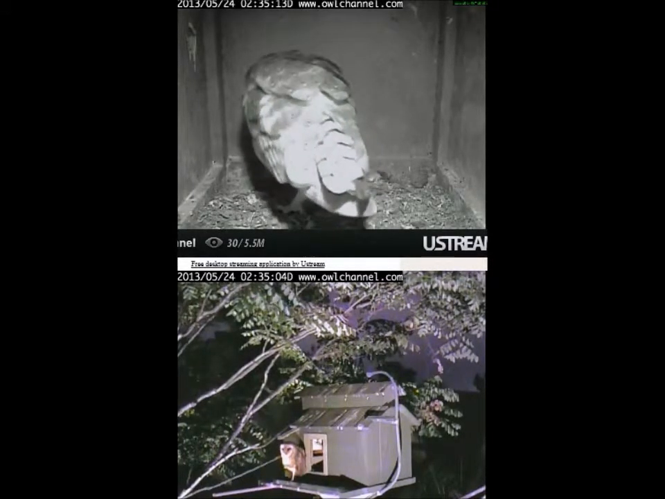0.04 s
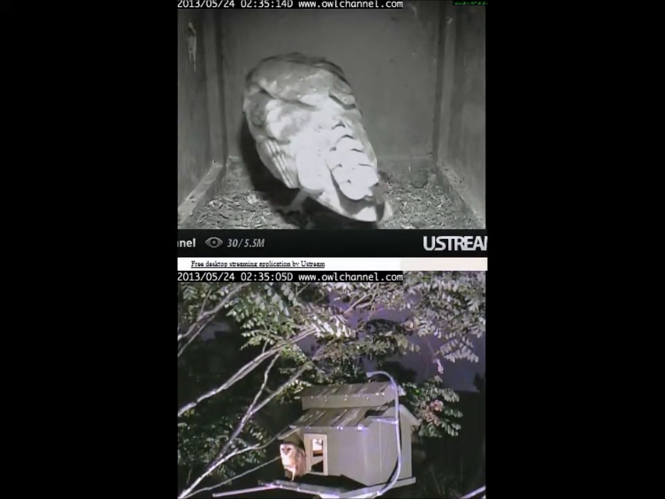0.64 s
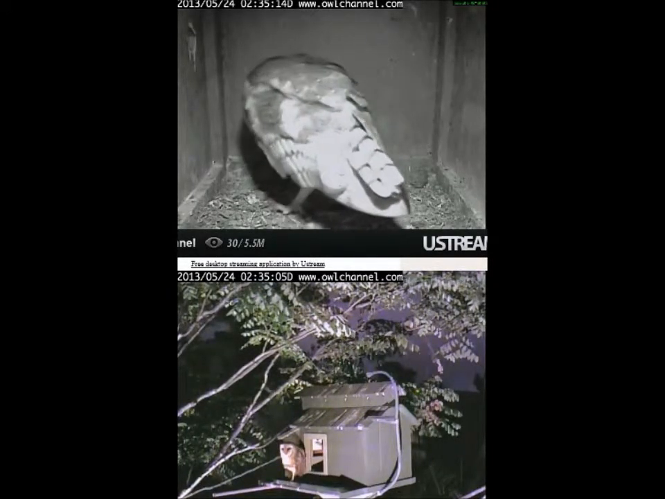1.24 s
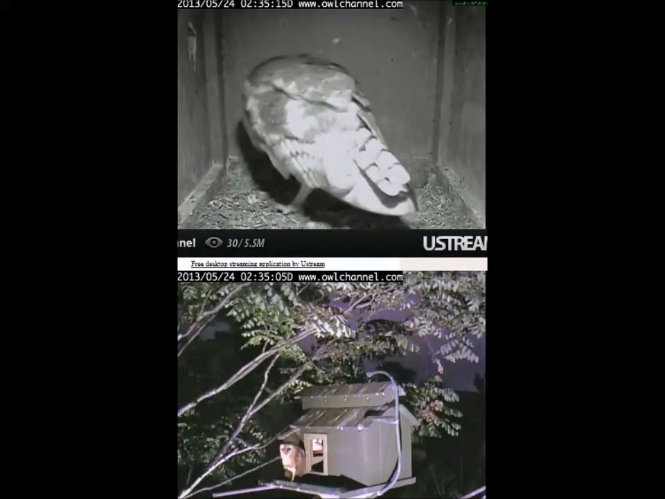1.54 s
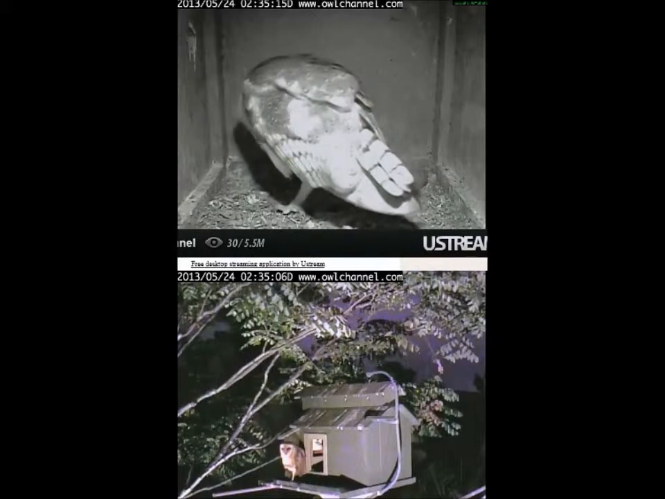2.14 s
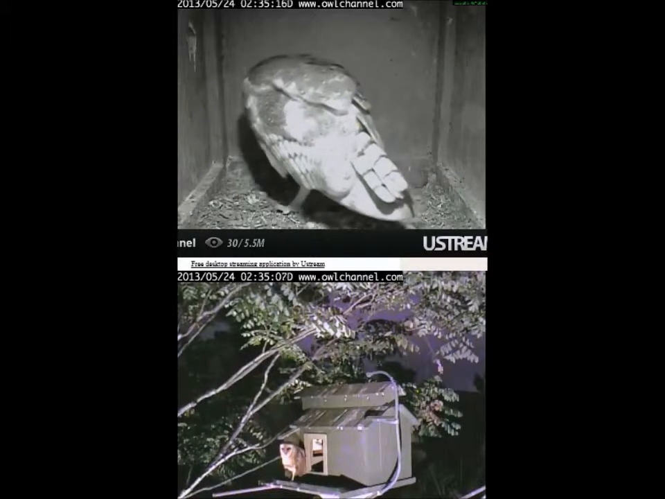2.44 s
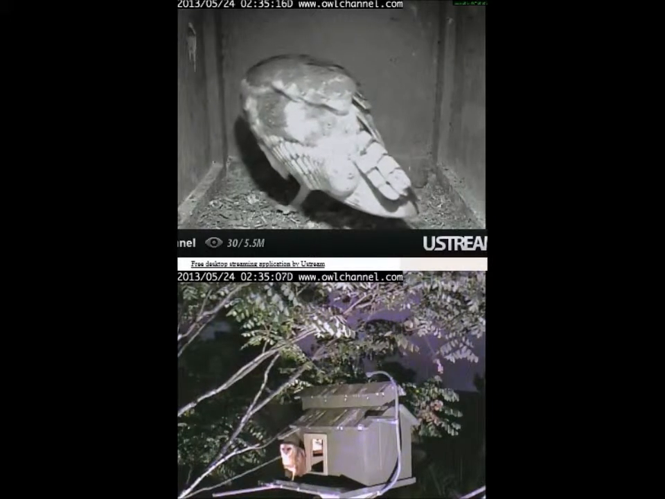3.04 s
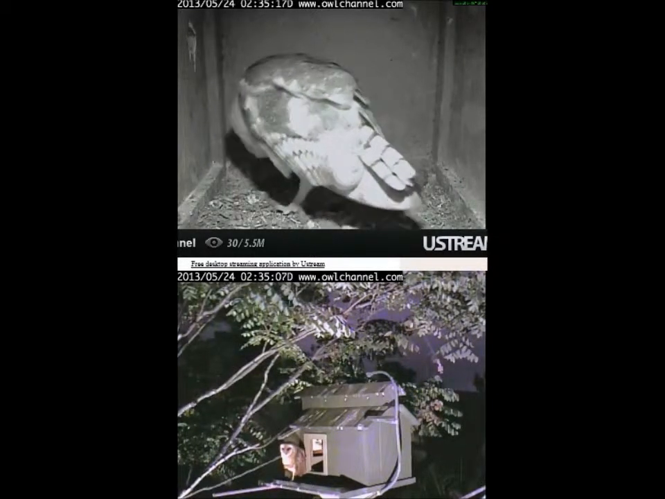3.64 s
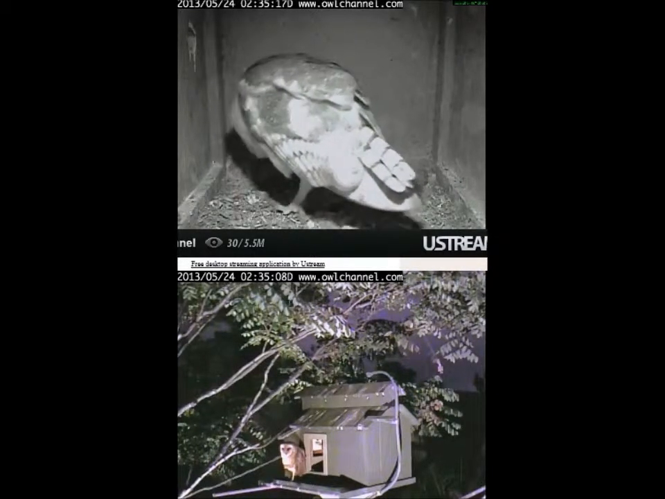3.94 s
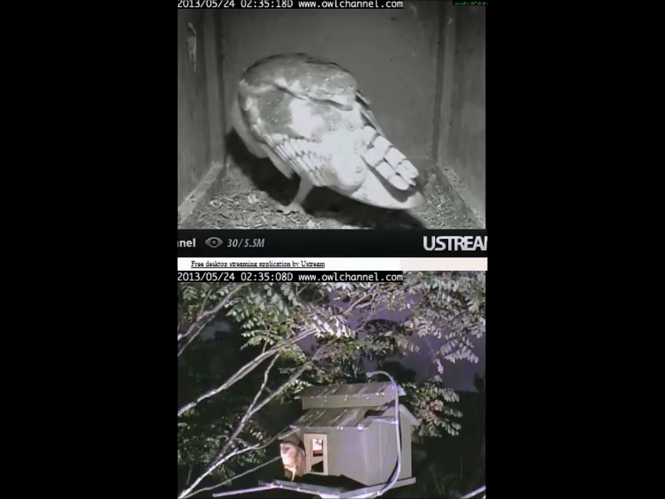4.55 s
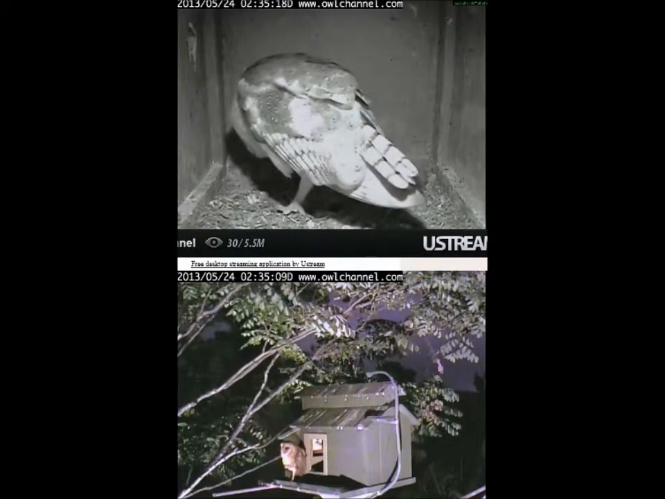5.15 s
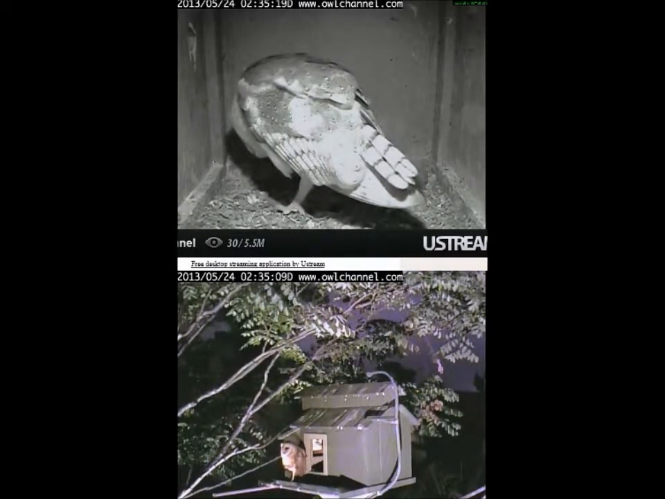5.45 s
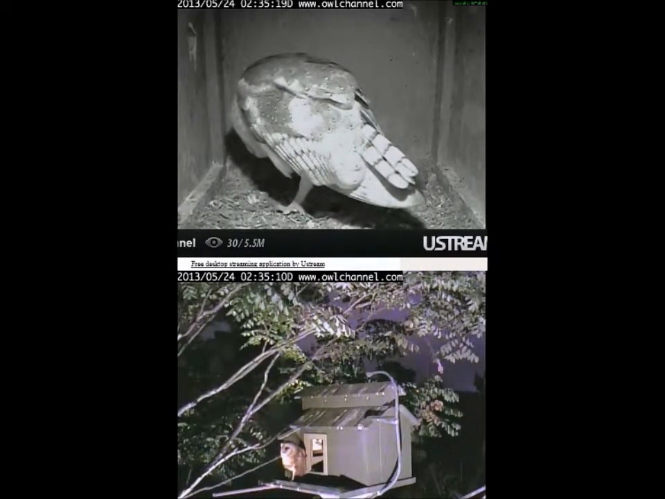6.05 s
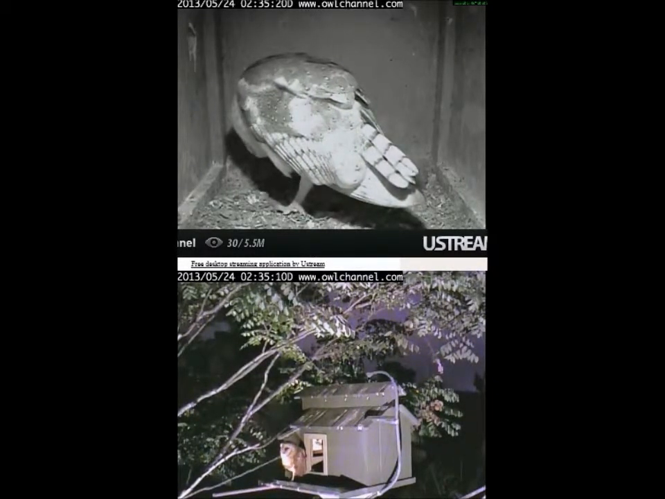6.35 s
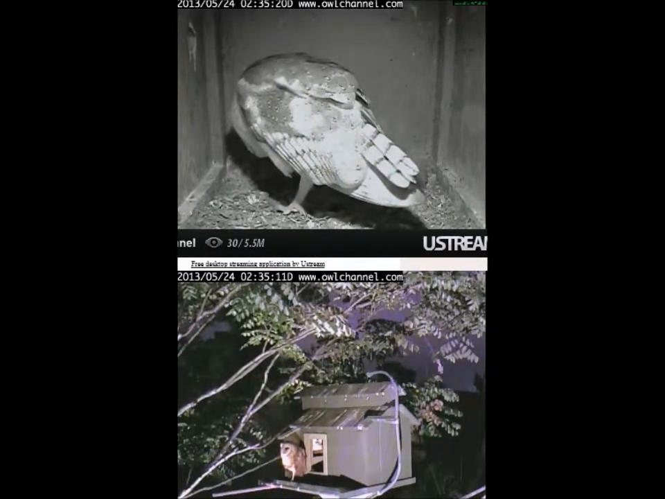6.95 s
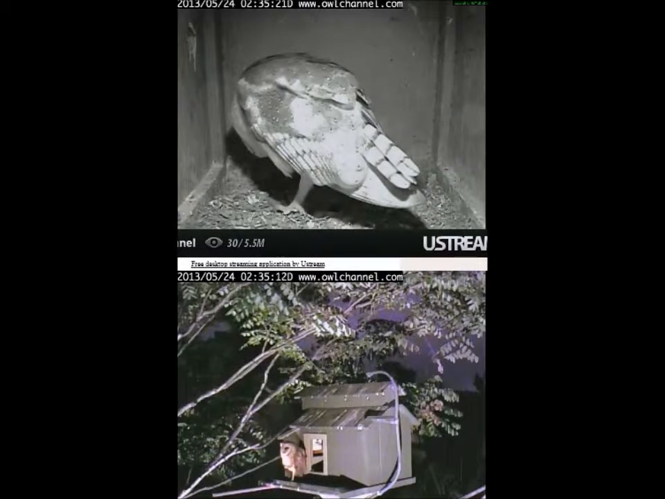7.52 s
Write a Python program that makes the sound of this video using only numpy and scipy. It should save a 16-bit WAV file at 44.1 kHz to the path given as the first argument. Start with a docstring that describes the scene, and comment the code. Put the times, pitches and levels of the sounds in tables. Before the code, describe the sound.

Three raspy, whistling barn owl hisses come a few seconds apart above a low throbbing hum and faint hiss.

```python
"""Barn owl hissing in a nest box

At night, a barn owl gives three rasping hisses in a wooden box. Each is turbulent air in the throat
with a shrill, unsteady whistle on top. A low rumble and the wash of the night outside fill the box.
A nest camera picks it all up, losing most of the treble and turning itself down at each call."""
import sys
import numpy as np
from scipy import signal
from scipy.fft import rfft, irfft, next_fast_len
from scipy.io import wavfile
from scipy.ndimage import uniform_filter1d

SR = 44100
rng = np.random.default_rng(int(sys.argv[2]) if len(sys.argv) > 2 else 0)


def generate_wav(signal):
    """Clip the signal to [-1, 1] and save it as 16-bit WAV at the path in sys.argv[1]."""
    frames = np.transpose(np.atleast_2d(signal))
    scaled = np.clip(frames, -1, 1) * 32767
    pcm = np.round(scaled).astype(np.int16)
    wavfile.write(sys.argv[1], SR, pcm)


N = 343098
SIZE = next_fast_len(N, True)
TIME, FREQS = np.arange(N) / SR, np.fft.rfftfreq(SIZE, 1 / SR)

# The owl's calls. Each row: start, length of the soft lead-in and length of the hold in seconds, then
# in dB the rasp, its growth, the shrill edge, the whistle, its growth, the opening and closing puffs.
CALLS = [(2.147, .066, .315, -41, 15, -51, -42, 8.5, -39.5, -36),
         (5.216, 0.023, 0.35, -34.5, 2.5, -38, -31.5, -1, -41.5, -45),
         (7.13, 0.08, .3, -34.5, 3, -40, -30, -3.5, -39, -55)]


def owl(rasp_gain, edge_gain, whistle_gain, flutter=.11, flutter_hz=110):
    """Turbulent air rasps through the throat and drives a whistle; all of it flutters together."""
    # The tone of the throat with the beak wide open. Each row: frequency in Hz, level in dB.
    throat = [(1000, -16), (1550, -14), (1950, -7), (2130, -2.5), (2210, -6), (2400, -1.5), (2590, 5),
              (2700, -16.5), (2790, 1.5), (2970, 1.5), (3110, -13), (3300, 9), (3430, -4), (3510, -17),
              (3600, -11)]
    shake = unit(np.exp(flutter * noise(lowpass(flutter_hz, order=2))))
    rasp = noise(spectrum(throat) + box() / 2)
    edge = unit(band(3645, half_width_hz=71, order=2).real)  # a shrill band above the whistle
    return shake * (rasp_gain * rasp + edge_gain * edge + whistle_gain * whistle())


def whistle(pitch_hz=3277, steadiness=.14):
    """A jet of air rings two close resonances, which beat against each other, and a weak third."""
    # The whistle's resonances. Each row: frequency in Hz, width in Hz, level in dB.
    modes = [(3175, 37, 7), (3326, 53, 8.5), (3600, 27, -8)]
    jet = band(pitch_hz, half_width_hz=96, order=3).real
    power = sum(amp(db) ** 2 * peak(hz, width) for hz, width, db in modes)
    tone = signal.hilbert(colour(jet, 10 * np.log10(power)))
    return unit((tone / (abs(tone) + 1e-9) ** steadiness).real)  # evens out the loudest moments


def breath(lead_rasp_db=-43, lead_whistle_db=-50, late_s=.0049, early_s=.013):
    """The owl's breath sets how strong the rasp, shrill edge, whistle and airflow are over time."""
    # The whistle falters under full pressure. Each row: time and half length in seconds, change in dB.
    falters = [(5.36, .018, -4), (5.48, 0.03, -16), (7.36, 0.1, -8)]
    rasp, edge, tone, flow = np.zeros((4, N))
    for opens, lead_s, hold_s, rasp_db, growth_db, edge_db, tone_db, tone_growth_db, _, _ in CALLS:
        full = opens + lead_s
        lead = ramp(opens, .053) * (1 - ramp(full, .023))
        push = pressure(full, hold_s, growth_db)
        # The whistle catches just after the air starts and breaks off just before it ends.
        blow = pressure(full + late_s, hold_s - late_s - early_s, tone_growth_db)
        rasp += amp(lead_rasp_db) * lead + amp(rasp_db) * push
        edge += amp(edge_db) * push
        tone += amp(lead_whistle_db) * lead + amp(tone_db) * blow
        flow += pressure(full, hold_s)
    tone *= amp(sum(db * bump(s, half) for s, half, db in falters))
    return rasp, edge, tone, flow


def pressure(full, hold_s, growth_db=0, attack_s=.023, release_s=.035):
    """The air pressure of one call rises fast, grows or sags while held, then drops sharply."""
    progress = np.clip((TIME - full) / (.87 * hold_s), 0, 1)
    growth = amp(growth_db * (progress - .5))
    return ramp(full, attack_s) * growth * (1 - ramp(full + hold_s, release_s))


def beak(opening_s=.053, shutting_s=.022, linger_s=.057, linger_db=-6, widening_db=-8):
    """The beak puffs as it opens; its hollow note rises as it widens and falls as it shuts."""
    # The tone of the breathy opening puff. Each row: frequency in Hz, level in dB.
    puff_tone = [(200, -26.5), (400, 3.5), (1000, -2), (1900, -2), (3000, -14)]
    shut_hz, half_hz, widening_hz, open_hz = 895, 1120, 1950, 2520
    path, puff, sweep = [], 0, 0
    for opens, lead_s, hold_s, rasp_db, *_, open_db, shut_db in CALLS:
        full = opens + lead_s
        shuts = full + hold_s
        path += [(opens, half_hz), (full, widening_hz),
                 (shuts - shutting_s, open_hz), (shuts, half_hz), (shuts + shutting_s, shut_hz)]
        linger = amp(linger_db) * bump(opens + linger_s, linger_s)
        puff += amp(open_db) * np.maximum(bump(opens, opening_s), linger)
        sweep += amp(rasp_db + widening_db) * bump(full + opening_s / 2, opening_s)
        sweep += amp(shut_db) * bump(shuts, shutting_s)
    hollow = band(np.interp(TIME, *np.transpose(path)), half_width_hz=300, order=2).real
    return puff * noise(spectrum(puff_tone) + box()) + sweep * unit(colour(hollow, box()))


def box():
    """The hollow box boosts some frequencies and weakens others; gives the change in dB."""
    # The box's peaks and dips. Each row: frequency in Hz, width in Hz, change in dB.
    resonances = [(446.4, 46, 5), (825.5, 127, 8), (1104, 104, 5.5), (1352, 280, 7), (1495, 96, -5.5),
                  (1820, 160, 3.5), (1980, 34, 5.5), (2480, 66, 4.5), (3053, 61, 5)]
    return sum(db * peak(hz, width) for hz, width, db in resonances)


def rumble(rumble_db=-22.5, hum_db=-31, throb_db=2.2):
    """A deep rumble and a throbbing hum above it surge now and then."""
    # The low resonances of the rumble and of the hum. Each row: frequency in Hz, level in dB.
    rumble_tone = [(6, -30), (20, -7), (32, 1.5), (49, -5.5), (63, -27.5), (100, -37), (300, -100)]
    hum_tone = [(30, -63), (62, -15.5), (72, -9), (81, -10), (96, -1), (114, -7), (128, -18.5), (170, -37),
                (400, -100)]
    # Brief surges. Each row: time and half length in seconds, then rumble and hum change in dB.
    surges = [(0.462, 0.17, 4, 0), (1.15, 0.085, 5.5, 7.5), (1.398, 0.034, 8, 0), (2.15, 0.048, 6.5, 4.5),
              (4.4, 0.31, 2.5, -0.5), (5.883, 0.044, 9.5, 2), (6.948, 0.14, 7.5, 6), (7.42, 0.023, 17, 0.5)]
    rumble_db += sum(db * bump(s, half) for s, half, db, _ in surges)
    hum_db += sum(db * bump(s, half) for s, half, _, db in surges)
    hum_db += throb_db * noise(lowpass(hz=7, order=2))
    return amp(rumble_db) * throb(rumble_tone, evenness=.9) + amp(hum_db) * throb(hum_tone, evenness=.5)


def throb(points, evenness):
    """Turbulence stirs a low resonance: it beats quickly, but its slower swings are evened out."""
    wave = signal.hilbert(noise(spectrum(points)), SIZE)[:N]
    strength = np.sqrt(uniform_filter1d(abs(wave) ** 2, size=24000))  # over about half a second
    return unit(wave.real / strength ** evenness)


def night(air_db=-36, waver_db=.5):
    """Wavering night air and far-off swells of wind or traffic come in through the box."""
    # The tone of the air outside. Each row: frequency in Hz, level in dB.
    air_tone = [(80, 8.5), (130, 14), (150, 16.5), (168, 18), (195, 14), (250, 10), (370, 4.5), (550, 0),
                (800, -3), (1000, -6), (1500, -7.5), (2200, -6.5), (3000, -7), (3400, -8.5), (3800, -11.5)]
    # Distant swells. Each row: time and half length in seconds, level in dB, centre frequency in Hz.
    swells = [(.1, 0.61, -48, 1049), (1.4, 0.58, -47.5, 1197), (2.6, 0.63, -52, 1157),
              (4.0, 0.33, -57.5, 899), (4.6, 0.51, -48.5, 1601)]
    air = amp(air_db) * noise(spectrum(air_tone) + box())
    times, _, _, centres_hz = np.transpose(swells)
    swell = unit(band(np.interp(TIME, times, centres_hz), half_width_hz=600, order=3).real)
    swell *= sum(amp(db) * bump(s, half) for s, half, db, _ in swells)
    waver = amp(waver_db * noise(lowpass(hz=14, order=2)))
    return (air + colour(swell, box())) * waver


def amp(db):
    """Turns decibels into a number to multiply by."""
    return 10 ** (np.asarray(db) / 20)


def unit(x):
    """Scales a sound to an average power of one."""
    return x / np.sqrt(np.mean(x ** 2) + 1e-20)


def spectrum(points):
    """Joins (Hz, dB) points into a curve on a log-frequency scale."""
    hz, db = np.transpose(points)
    return np.interp(np.log(FREQS + 1), np.log(hz + 1), db)


def peak(hz, width_hz):
    """The shape of one resonance: one at its centre, fading to either side."""
    return 1 / (1 + (2 * (FREQS - hz) / width_hz) ** 2)


def lowpass(hz, order):
    """A dB curve that cuts the highs; a higher order cuts more steeply."""
    return -10 * np.log10(1 + (FREQS / hz) ** (2 * order))


def colour(x, db):
    """Turns each frequency up or down along a dB curve."""
    return irfft(rfft(x, SIZE) * amp(db), SIZE)[:N]


def noise(db):
    """Noise of power one, shaped by a dB curve."""
    return unit(colour(rng.standard_normal(N), db))


def band(centre_hz, half_width_hz, order):
    """A band of noise whose centre can glide; its real part is the sound."""
    shape = lowpass(half_width_hz, order)
    turn = np.exp(2j * np.pi * np.cumsum(centre_hz * np.ones(N)) / SR)
    return turn * (noise(shape) + 1j * noise(shape))


def bump(s, half_length_s):
    """A smooth hill of height one around a moment."""
    return np.exp(-((TIME - s) / half_length_s) ** 2)


def ramp(s, length_s):
    """A smooth step from zero to one, centred on a moment."""
    return .5 + .5 * np.sin(np.pi * np.clip((TIME - s) / length_s, -.5, .5))


def scene(mic_edge_hz=3512, fizz_db=-64, overtone_db=-34, hiss_db=-56.5, sink_db=-1.5, sink_s=.97):
    """The microphone cuts the treble, leaving a thin fizz, the whistle's overtone and its own hiss."""
    rasp_gain, edge_gain, whistle_gain, flow = breath()
    in_box = owl(rasp_gain, edge_gain, whistle_gain) + beak() + rumble() + night()
    heard = colour(in_box, lowpass(mic_edge_hz, order=22))
    flare = amp(-61) * bump(2.335, .035)  # a moment of extra fizz in the first call
    fizz = (amp(fizz_db) * flow + flare) * noise(lowpass(hz=7500, order=2))
    overtone = amp(overtone_db) * whistle_gain * unit(band(6580, half_width_hz=420, order=1).real)
    hiss = amp(hiss_db) * noise(spectrum([(4000, 3), (6000, .9), (10000, 1), (16000, 1)]))
    sink = amp(sink_db * ramp(TIME[-1] - sink_s / 2, sink_s))  # everything dips a little at the end
    return ((heard + fizz + overtone + hiss) * sink)[None]


def record(dry, threshold_db=-38, squeeze=.35, recovery_db_per_s=7, lag_s=.12, whine_db=-58):
    """The camera turns itself down at each shrill call; its converter adds a faint whine."""
    x = dry[0]
    treble = signal.sosfilt(signal.butter(2, 1500, "high", fs=SR, output="sos"), x)
    power_db = 10 * np.log10(abs(uniform_filter1d(treble ** 2, size=4000)) + 1e-12)
    fall_db = TIME * recovery_db_per_s
    held_db = np.maximum.accumulate(power_db + fall_db) - fall_db  # jumps up, then sinks slowly
    over_db = np.maximum(held_db - threshold_db, 0)
    lag = np.exp(-1 / (lag_s * SR))
    x = x / amp(squeeze * signal.lfilter([1 - lag], [1, -lag], over_db))
    clock = np.cos(2 * np.pi * 8000 * TIME)
    x *= 1 + 2 * amp(whine_db) * clock  # the whine follows the sound, mostly the rumble
    x *= signal.windows.tukey(N, .001)  # tiny fades at both ends
    top_cut = signal.firwin(801, cutoff=15800, window=("kaiser", 9), fs=SR)
    return signal.oaconvolve(x, top_cut, "same")[None]


dry = scene()
out = record(dry)
generate_wav(out)
```